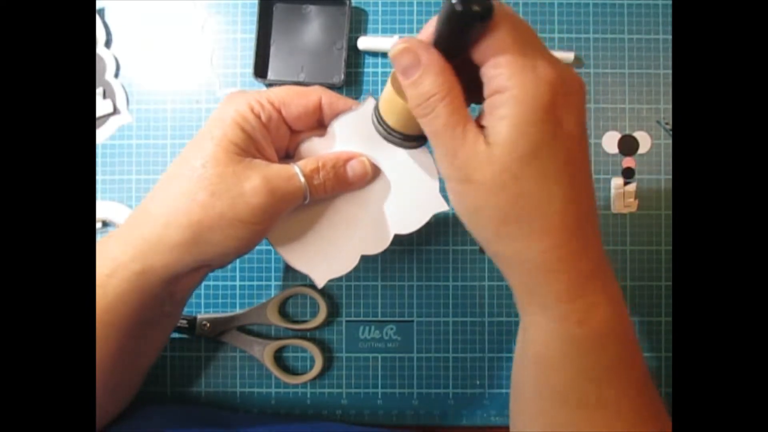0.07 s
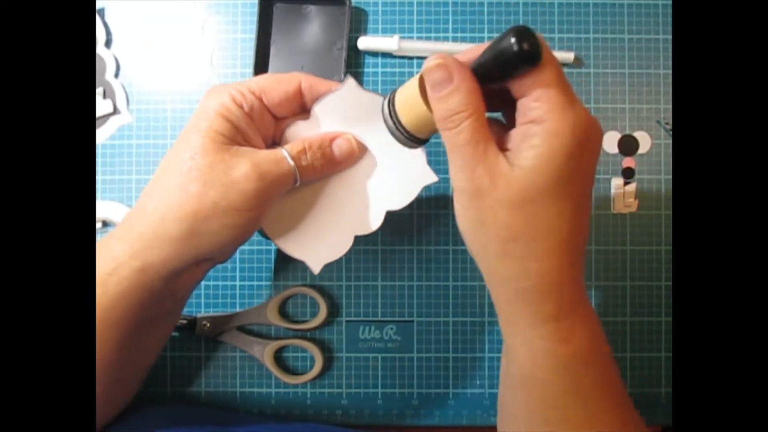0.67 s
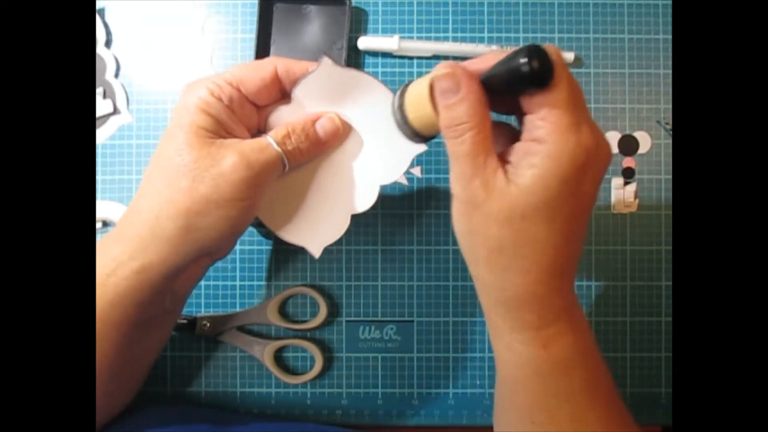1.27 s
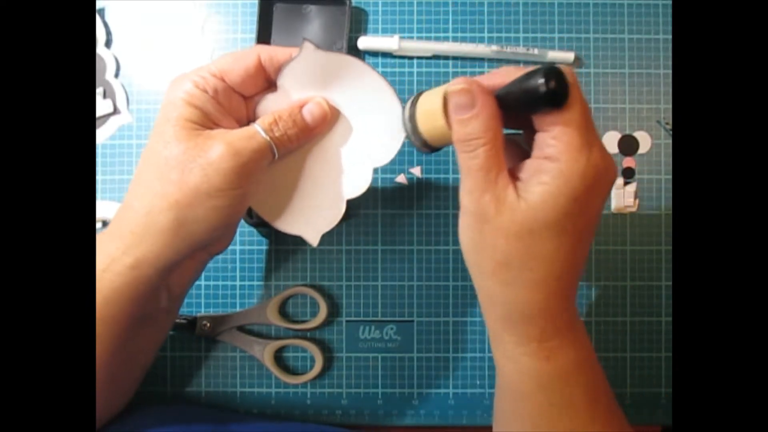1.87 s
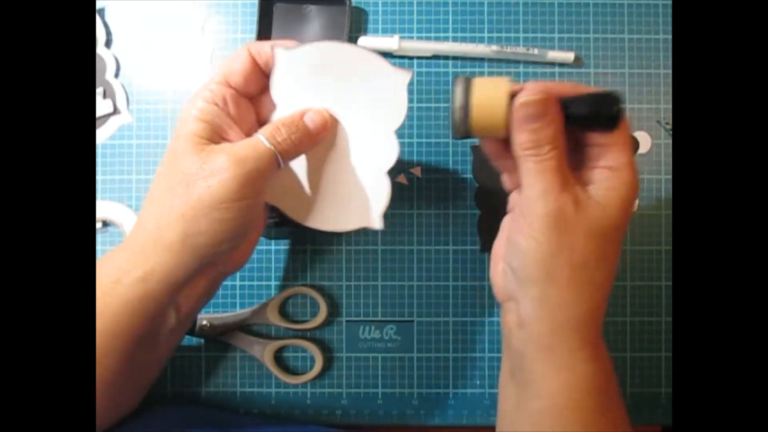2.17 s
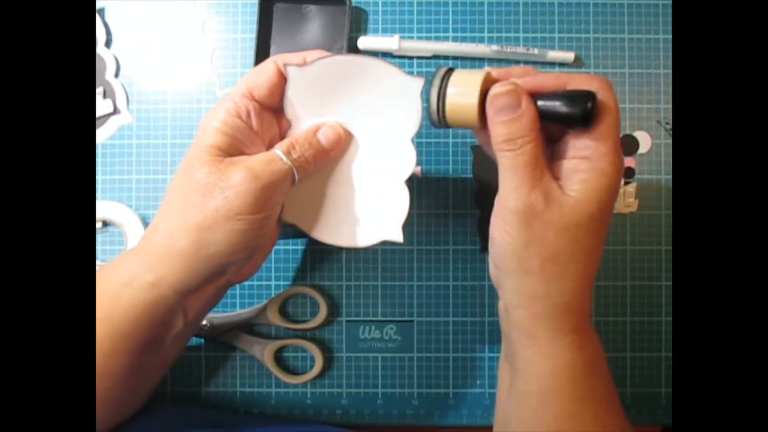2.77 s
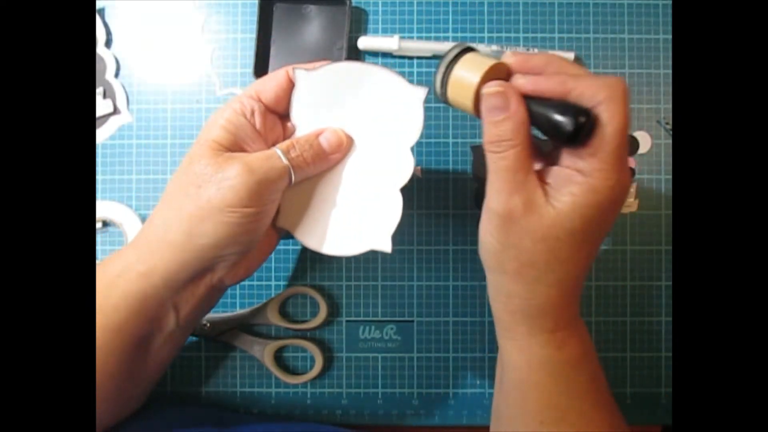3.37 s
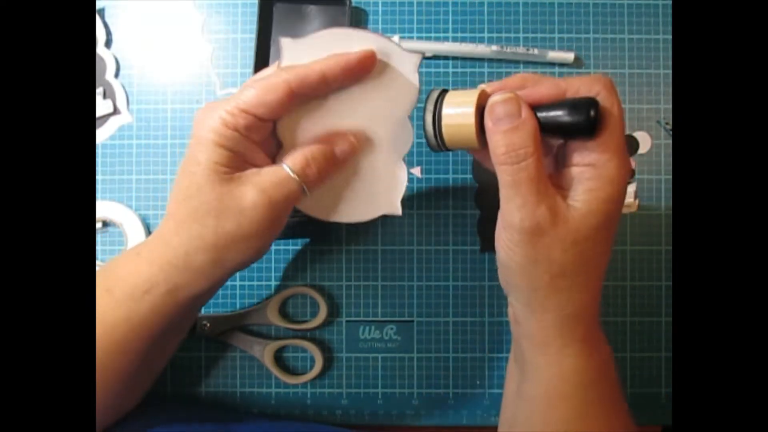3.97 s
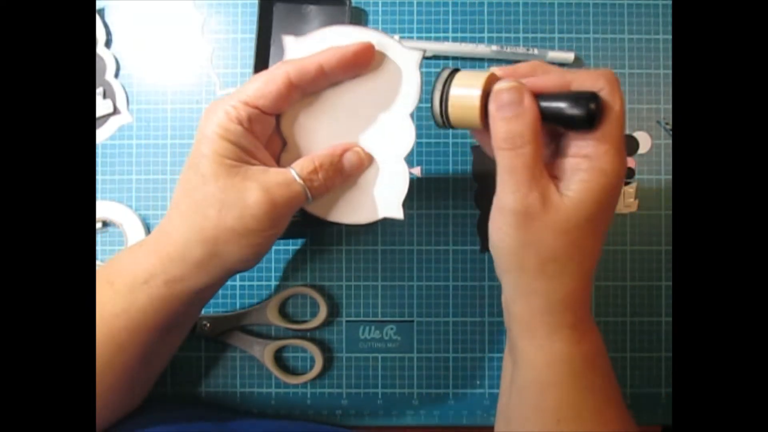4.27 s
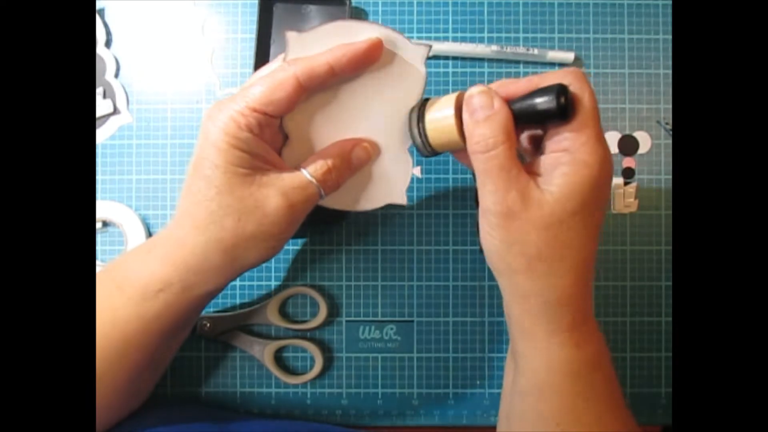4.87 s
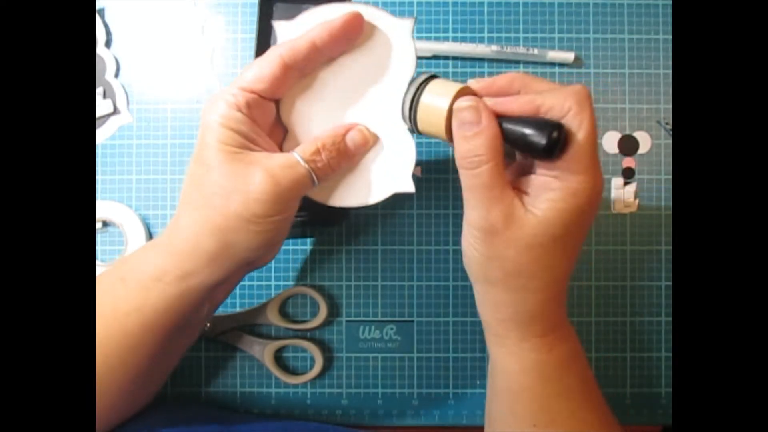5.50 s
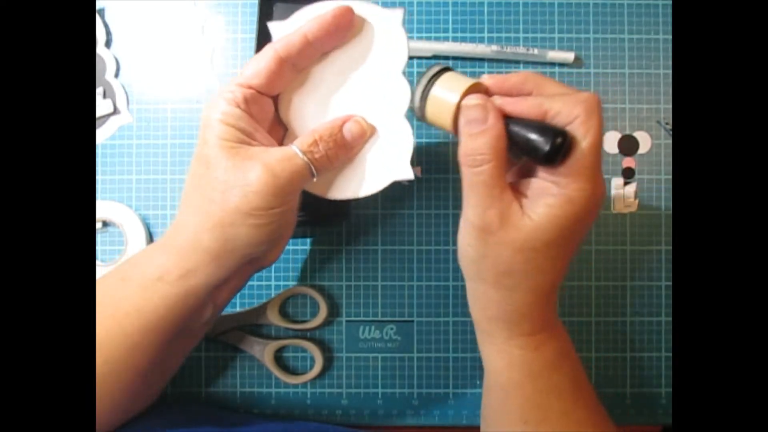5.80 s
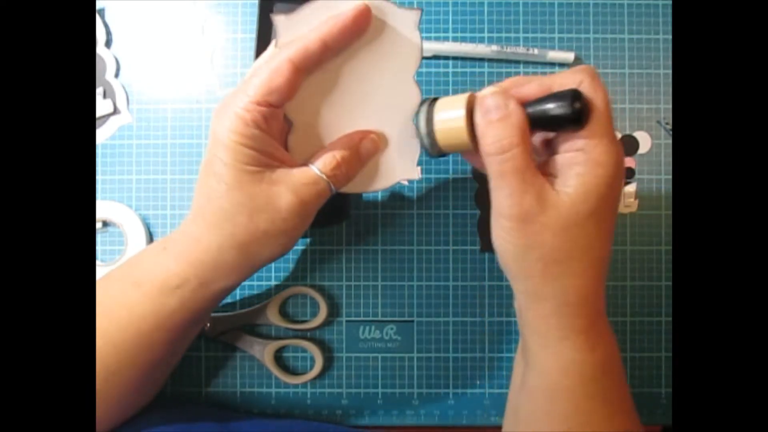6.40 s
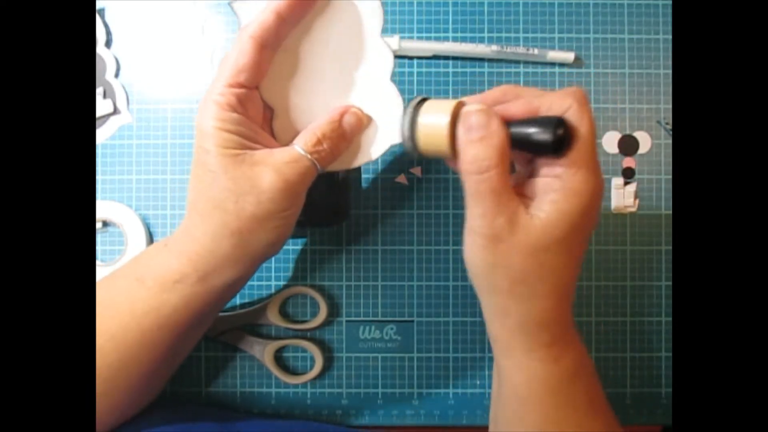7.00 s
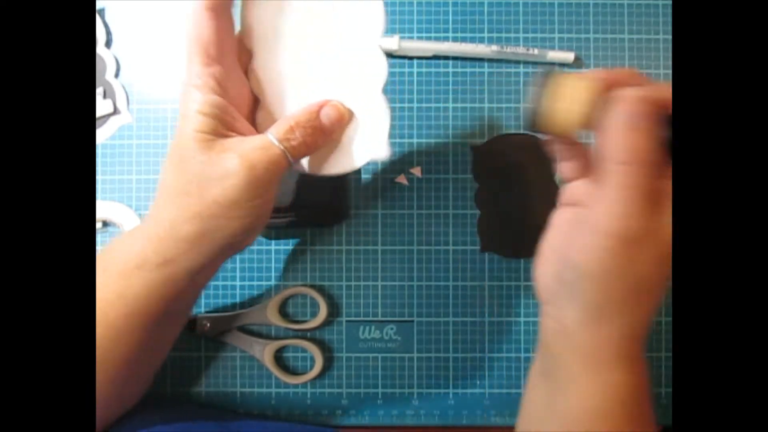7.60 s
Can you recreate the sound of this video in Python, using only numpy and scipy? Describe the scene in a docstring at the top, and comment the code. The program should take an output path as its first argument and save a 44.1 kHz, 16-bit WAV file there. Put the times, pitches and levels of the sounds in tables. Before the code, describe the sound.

A foam ink blender rubs rhythmically along a card's edge, with dry scrapes, small papery snaps and a faint hum.

```python
"""Inking the edge of a card

Close up in a small, dry craft room, a foam ink blender is flicked over the edge of hand-held cardstock,
about five strokes a second. The foam pats, grips and scrapes in fine grains that shake the sheet; the
edge ticks as it catches and snaps back as it slips off the pad. Fingers slide on the card as it is
turned. Mains hum and faint hiss lie behind it all."""
import sys
import numpy as np
from scipy import signal
from scipy.fft import rfft, irfft
from scipy.io import wavfile

SR = 44100
rng = np.random.default_rng(int(sys.argv[2]) if len(sys.argv) > 2 else 0)


def put_to_file(sound):
    """Save the sound as 16-bit audio at rate SR, in the file named by the first command-line argument."""
    columns = np.atleast_2d(sound).T  # one column per channel
    safe = np.clip(columns, -1, 1)
    whole_steps = np.round(safe * 32767)
    wavfile.write(sys.argv[1], SR, whole_steps.astype(np.int16))


N = 337365
TIME = np.arange(N) / SR
BLOW_TIME = TIME[:SR // 8]
FREQS = np.maximum(np.arange(N // 2 + 1) * SR / N, 1)

# Flicks of the foam over the edge. Each row: peak time in seconds, length in seconds, level in dB,
# ring of the rubbed span in Hz.
STROKES = [(0.159, 0.079, -44, 760), (0.352, 0.091, -47, 1410), (0.552, 0.064, -36, 1570),
           (0.763, 0.095, -39.5, 1350), (0.987, 0.083, -41, 760), (1.18, 0.087, -40, 746),
           (1.39, 0.091, -43.5, 806), (1.59, 0.11, -42.5, 935), (1.8, 0.12, -47, 790),
           (2.005, 0.071, -44.5, 800), (2.537, 0.078, -38.5, 1410), (2.739, 0.058, -36, 1470),
           (2.933, 0.057, -36, 990), (3.103, 0.057, -39.5, 1450), (3.299, 0.046, -48, 1500),
           (3.375, 0.074, -46, 1400), (3.58, 0.078, -40.5, 1450), (4.235, 0.076, -41, 730),
           (4.451, 0.047, -40, 760), (4.707, 0.1, -41.5, 820), (4.935, 0.1, -48.5, 900),
           (5.151, 0.08, -48, 724), (5.35, 0.089, -41.5, 960), (5.599, 0.06, -39.5, 890),
           (5.822, 0.057, -43.5, 920), (5.944, 0.047, -45, 1430), (6.069, 0.1, -46, 1130),
           (6.336, 0.061, -39.5, 1240), (6.532, 0.076, -39.5, 945), (6.754, 0.088, -44, 1370),
           (6.948, 0.15, -46.5, 1200), (7.018, 0.063, -47, 1300), (7.149, 0.13, -47.5, 1090),
           (7.351, 0.095, -49, 800), (7.516, 0.057, -37, 1400)]
# Tone of the strokes as the pad works round the card. Each row: time in seconds, body and hiss in dB
# against the stroke's level, ring of the free edge in Hz.
EDGE_COLOUR = [(0.16, 2, -3, 3250), (0.55, -0.5, -5, 3300), (1.8, -0.5, -7, 2960), (2.54, 0, -4.5, 3200),
               (2.75, -2, -6, 3140), (3.1, -2.5, -4, 2870), (3.58, -5, -5.5, 3170), (4.24, 3, -5, 2900),
               (5.15, 4.5, -4, 3200), (5.6, -3.5, -9, 2880), (5.82, 3, -6, 2760), (5.95, 2.5, 1, 2670),
               (6.5, 0.5, -7.5, 2950), (6.75, 1, 0.5, 3060), (7.36, -2.5, 1.5, 2750), (7.51, 3.5, -3, 2830)]
# The bent card springs off the pad. Each row: start in seconds, level in dB, centre of the ring in Hz,
# thump of the two lowest modes in dB, ring of the free edge in dB.
SNAPS = [(0.1654, -30.5, 830, -12, -18), (2.5528, -37.5, 1300, -15, -13), (2.9377, -34, 1100, -12, -9),
         (3.105, -31, 1310, -13, -1), (4.2445, -26, 800, 9.5, -13), (4.4545, -31, 950, 1, -26),
         (4.4764, -27.5, 700, 7, -15), (4.7369, -37, 900, 7, -5), (5.6039, -29, 1000, -17, -2.5),
         (6.0548, -22.5, 890, 4, -7.5), (6.9748, -23.5, 650, 1.5, -39), (7.1707, -19.5, 690, -6, -15),
         (7.5123, -11.5, 970, 3, -14)]
# Bending modes of the held card. Each row: pitch in Hz, level in dB, seconds to fall by 60 dB.
CARD_MODES = [(176, -6, 0.15), (273, 7, 0.021), (441, -11.5, 0.079), (551, -12, 0.14), (661, -5, 0.1),
              (770, 2.5, 0.031), (885, 5, 0.019), (1080, 3, 0.023), (1400, 2, 0.024), (1560, -2.5, 0.038),
              (2322, -8, 0.04), (2810, 6.5, 0.013), (3525, 4, 0.028)]


def from_db(db):
    """Decibels to gain."""
    return 10 ** (np.asarray(db) / 20)


def rms_one(x):
    """Scale to unit rms."""
    return x / np.sqrt(np.mean(x ** 2) + 1e-20)


def on_freqs(points):
    """Read rows of frequency in Hz and value along a log-frequency axis."""
    hz, value = np.transpose(points)
    return np.interp(np.log(FREQS), np.log(hz), value)


def butter(x, hz, kind, order=2):
    """Causal Butterworth filter."""
    return signal.sosfilt(signal.butter(order, hz, kind, fs=SR, output="sos"), x + 1e-18)


def resonator(hz, width_hz):
    """Filter coefficients of a single resonant peak."""
    return signal.iirpeak(hz, hz / width_hz, fs=SR)


def drift(rate_hz):
    """Smooth random wander of unit rms."""
    pole = np.exp(-2 * np.pi * rate_hz / SR)
    return rms_one(signal.lfilter([1], [1, -2 * pole, pole ** 2], rng.standard_normal(N + SR))[SR:])


def delayed(pair, delay_s):
    """Read a steady stereo noise through a moving delay."""
    when = (TIME - delay_s) % TIME[-1]
    return np.array([np.interp(when, TIME, channel) for channel in pair])


def add(out, s, sound):
    """Mix a short sound in at a given time."""
    start = round(s * SR)
    out[:, start:start + sound.shape[-1]] += sound[..., :N - start]


def stereo_noise(pair, colour, likeness):
    """Two unrelated noises become a coloured, partly alike left and right."""
    mid, side = rfft(pair)
    alike = np.clip(on_freqs(likeness), -1, 1)
    spectrum = np.sqrt(1 + alike) * mid + np.sqrt(1 - alike) * side * [[1], [-1]]
    return irfft(from_db(on_freqs(colour)) * spectrum, N)


def room_tone(air_db=-45, mains_hz=59.8, mains_db=-54.5, octave_hz=120):
    """Rumble and hiss from all round the room, with a gently wavering mains hum."""
    # Colour of the room's noise. Each row: frequency in Hz, relative level in dB.
    colour = [(20, 4.5), (40, -7), (58, 11.5), (80, -6.5), (105, 6), (128, 14), (160, 3.5), (200, -4.5),
              (250, -2.5), (450, -10.5), (660, -10), (1500, -18.5), (2000, -23), (7000, -26), (16000, -32)]
    # Likeness of left and right for distant sound. Each row: frequency in Hz, correlation.
    likeness = [(30, 0.4), (140, 0.89), (250, 0.26), (500, 0.0035), (650, 0.51), (1500, 0.37),
                (5000, 0.015)]
    # The hum's octave swells and fades. Each row: time in seconds, level in dB.
    octave_levels = [(0.0, -68), (1.4, -53.5), (2.42, -38), (2.66, -46), (3.3, -51), (4.1, -51),
                     (4.85, -47), (5.3, -57), (6.2, -46.5), (7.65, -45.5)]
    air = rms_one(stereo_noise(rng.standard_normal((2, N)), colour, likeness))
    partials = [(mains_hz, mains_db), (octave_hz, np.interp(TIME, *np.transpose(octave_levels)))]
    hum = sum(from_db(db) * np.sin(2 * np.pi * hz * TIME + drift(rate_hz=4)) for hz, db in partials)
    return from_db(air_db) * air + hum


def edge_pitch(s):
    """The free edge rings at a pitch that moves as the card is turned and held anew."""
    when, _, _, ring_hz = np.transpose(EDGE_COLOUR)
    return np.interp(s, when, ring_hz)


def span_pitch(s):
    """The span of card between thumb and pad has its own pitch in every stroke."""
    when, _, _, ring_hz = np.transpose(STROKES)
    return ring_hz[np.argmin(np.abs(when - s))]


def moving_ring(grains, pitch, width_hz, size=512):
    """A resonance whose centre follows a pitch in time."""
    out, state = np.zeros((2, N)), np.zeros((2, 2))
    for i in range(0, N, size):
        peak = resonator(pitch(TIME[i]), width_hz)
        out[:, i:i + size], state = signal.lfilter(*peak, grains[:, i:i + size], zi=state)
    return out


def card_resonance(grains, lift_db=-2.0, swing_db=2.5, swing_hz=3, widen=1.12, bend=.05):
    """Friction shakes the card's upper modes; which ones answer depends on where the edge is touched."""
    ringing = 0
    for hz, _, t60 in CARD_MODES[4:]:
        width_hz = widen * np.log(1000) / (np.pi * t60)
        answer = from_db(lift_db + swing_db * np.tanh(drift(swing_hz)))
        ringing = ringing + answer * signal.lfilter(*resonator(hz, width_hz), grains)
    edge = from_db(2.2) * moving_ring(grains, edge_pitch, width_hz=440)
    span = moving_ring(grains, span_pitch, width_hz=270)
    # bending stiffens the sheet, so its modes glide a little from stroke to stroke
    glide_s = np.cumsum(bend * np.tanh(drift(swing_hz))) / SR
    sheet = grains + edge + span + delayed(ringing, glide_s)
    # a faint, slowly drifting comb gives each stroke its own fine colour
    comb_s = 0.001112 * (1 + np.tanh(drift(0.92)) / 10)
    return sheet + 0.25 * delayed(sheet, comb_s)


def friction(passes, colour, slips_per_s, crackle_db, judder_db, judder_hz, sharpness,
             boom_db, boom_growth, trim_db):
    """Tiny fibre slips, swelling and fading with each pass, heard as boom, body, rasp and hiss."""
    # Likeness of left and right close to the microphone. Each row: frequency in Hz, correlation.
    likeness = [(200, 0.89), (700, 0.99), (1600, 1), (3300, 0.94), (4300, 0.54), (9000, 0.62),
                (15000, 0.32)]
    # Borders of the boom, body, rasp and hiss bands in Hz.
    band_edges = [60, 500, 2200, 7500, 17000]
    # Release of each band as a multiple of the pass's fall: the treble stops first.
    releases = [1.3, 0.99, 0.9, 0.86]
    size_db = crackle_db * np.minimum(rng.exponential(1, N), 5)
    slipping = rng.random(N) < slips_per_s / SR
    slips = slipping * from_db(size_db + judder_db * np.tanh(drift(judder_hz)))
    grains = stereo_noise(slips * rng.standard_normal((2, N)), colour, likeness)
    sheet = rfft(card_resonance(grains))
    power = np.zeros((4, N))
    for s, rise, fall, rasp_db, body_db, hiss_db in passes:
        near = slice(*np.searchsorted(TIME, [s - 3 * rise, s + 3 * fall]))
        since = TIME[near] - s
        pressing = np.maximum(-since / rise, 0) ** sharpness
        letting_go = np.maximum(since / (fall * np.array(releases)[:, None]), 0) ** 2
        # the more the whole sheet is shaken, the faster its lowest bending grows
        bands_db = np.array([boom_db + boom_growth * body_db, body_db, 0, hiss_db]) + trim_db
        power[:, near] += from_db(rasp_db + bands_db[:, None] - 20 * (pressing + letting_go)) ** 2
    bands = [rms_one(irfft(sheet * (FREQS >= low) * (FREQS < high), N))
             for low, high in zip(band_edges, band_edges[1:])]
    return sum(gain * band for gain, band in zip(np.sqrt(power), bands))


def foam_scrapes(rise_share=0.58):
    """The foam drags over the edge: swelling strokes, brief grips and a quick slip into each snap."""
    # Colour of foam on card. Each row: frequency in Hz, relative level in dB.
    colour = [(150, -9.5), (450, -6), (660, -2), (900, -3), (1200, -2), (1400, 2), (1700, -5.5), (2200, -8),
              (3300, -7), (4100, -11.5), (5500, -5.5), (8500, -10.5), (12000, -14.5), (16000, -20)]
    # The pad grips with a dull scuff just before it slides. Each row: peak time in seconds, level in dB.
    scuffs = [(0.506, -44.5), (0.708, -41), (0.931, -40.5), (1.128, -47.5), (1.958, -49), (2.512, -44),
              (3.564, -45.5)]
    s, length, level_db, _ = np.transpose(STROKES)
    when, body_db, hiss_db, _ = np.transpose(EDGE_COLOUR)
    rise = length * rise_share
    # Each pass: peak time, rise and fall in seconds, level in dB, body and hiss in dB against it.
    strokes = list(zip(s, rise, length - rise, level_db,
                       np.interp(s, when, body_db), np.interp(s, when, hiss_db)))
    grips = [(at, 0.014, 0.04, db, 1.5, -13) for at, db in scuffs]
    slips = [(at, 0.011, 0.006, min(db - 14, -40), 3, -3.5) for at, db, *_ in SNAPS]
    return friction(strokes + grips + slips, colour, slips_per_s=14000, crackle_db=-0.03, judder_db=4.0,
                    judder_hz=112, sharpness=1.48, boom_db=-16.0, boom_growth=3.2, trim_db=0.67)


def level_attack(ring):
    """Scale a ring to unit spread over its first ten milliseconds."""
    return ring / np.std(ring[BLOW_TIME < .01])


def card_ring(centre_hz, reach, thump_db=0, ring_db=-5.0, focus_db=4.0, rebound_s=0.00258):
    """A blow starts all the modes at once: a slow push favours the low ones, a quick catch the high."""
    hz, mode_db, t60 = np.array(CARD_MODES).T[:, :, None]
    strength_db = mode_db - focus_db * np.log2(hz / centre_hz) ** 2 + rng.standard_normal(hz.shape)
    strength_db[:2] += thump_db
    decays = from_db(strength_db - 60 * BLOW_TIME / t60)
    ring = np.sum(decays * np.sin(2 * np.pi * hz * BLOW_TIME), axis=0)
    # the edge rebounds and touches again at half strength, which colours every blow differently
    lag = 1 + int(rng.uniform(1, 2.004) * rebound_s * SR)
    ring = ring + .5 * np.pad(ring, (lag, 0))[:len(ring)]
    ring = butter(ring, reach * centre_hz, "low", order=3)   # the padded contact dulls the top
    ring = butter(ring, 143, "high")   # the small sheet radiates little bass
    return from_db(ring_db) * level_attack(ring)


def crack(spike_db=16.5, grit_db=8, grit_t60=0.014, band_hz=(2200, 10000), width=0.55):
    """One sharp click of the paper's edge, trailed by a little grit."""
    mid, side = rng.uniform(-np.sqrt(3), np.sqrt(3), (2, len(BLOW_TIME)))
    grit = mid + width * side * np.array([[1], [-1]])
    burst = grit * from_db(grit_db - 60 * BLOW_TIME / grit_t60)
    burst[:, 0] -= from_db(spike_db)
    return butter(burst, band_hz, "band", order=1)


def card_snaps(edge_t60=0.021, crack_db=-13):
    """The freed edge cracks and rings with a hollow note; the whole sheet thumps and rings with it."""
    out = np.zeros((2, N))
    for s, level_db, centre_hz, thump_db, edge_db in SNAPS:
        edge_decay = from_db(edge_db + 6 - 60 * BLOW_TIME / edge_t60)
        edge = edge_decay * np.sin(2 * np.pi * edge_pitch(s) * BLOW_TIME)
        sheet = card_ring(centre_hz, reach=2.53, thump_db=thump_db)
        add(out, s, from_db(level_db) * (sheet + edge + from_db(crack_db) * crack()))
    return out


def foam_pats(flatten_s=0.0014):
    """Many fibres land one after another, so the card answers with a blurred, dull ring."""
    # Soft landings ahead of a stroke. Each row: start in seconds, level in dB, centre of the ring in Hz.
    pats = [(0.2943, -47.5, 900), (0.478, -47.5, 1220), (0.674, -47.5, 1010), (0.888, -44.5, 800),
            (1.089, -44, 850), (1.302, -46.5, 920), (1.513, -46.5, 700), (2.4228, -40, 1150),
            (2.659, -49, 1310), (3.267, -47, 1100), (4.125, -47, 746), (4.413, -46.5, 800),
            (5.267, -44.5, 1010), (5.502, -45, 750), (6.233, -46.5, 940)]
    out, age = np.zeros((2, N)), BLOW_TIME / flatten_s
    for s, level_db, centre_hz in pats:
        press = rng.standard_normal(len(age)) * np.sqrt(age) * np.exp(-age)
        ring = signal.fftconvolve(card_ring(centre_hz, reach=1.8), press)[:len(age)]
        add(out, s, from_db(level_db) * level_attack(ring))
    return out


def edge_ticks(crack_db=-3.5):
    """The edge catches with a crack and a thin ring."""
    # Catches of the edge. Each row: start in seconds, level in dB.
    ticks = [(0.9346, -35.5), (1.5484, -41.5), (2.327, -52), (3.334, -44), (3.952, -47), (4.131, -50),
             (4.8063, -48.5), (5.373, -35), (5.939, -35.5), (5.989, -44), (6.6382, -43.5), (6.6716, -36.5),
             (6.696, -46), (7.0105, -45)]
    out = np.zeros((2, N))
    for s, level_db in ticks:
        ring = card_ring(centre_hz=1680, reach=2.4)
        add(out, s, from_db(level_db) * (ring + from_db(crack_db) * crack()))
    return out


def finger_slides(rise_share=0.35):
    """Skin rubs the card as it is turned; each slide starts quickly and trails off."""
    # Slides of the fingers. Each row: peak time and length in seconds, level and brightness in dB.
    slides = [(2.095, 0.35, -51, -0.5), (2.204, 0.041, -63, -11), (2.41, 0.17, -52.5, 3.5),
              (3.667, 0.25, -52.5, -1), (3.874, 0.1, -58.5, 0.5), (3.96, 0.066, -43.5, 2.5),
              (4.036, 0.3, -56, -0.5), (4.69, 1, -69, -9.5), (5.198, 0.031, -45.5, -1.5),
              (6.02, 0.21, -53.5, -1), (6.121, 0.025, -50.5, -0.5), (6.247, 0.031, -49, -0.5),
              (6.673, 0.026, -40.5, -0.5), (7.614, 0.18, -42.5, 3.5)]
    # Colour of skin on card. Each row: frequency in Hz, relative level in dB.
    colour = [(150, 7), (450, -1), (700, 2), (1100, -4), (1450, 3), (2000, -6), (3000, -12), (4200, -8),
              (6500, -3), (9000, -7.5), (16000, -12)]
    s, length, level_db, bright_db = np.transpose(slides)
    rise = length * rise_share
    body_db = -4 - 1.66 * bright_db   # a light, bright touch shakes the card less
    hiss_db = bright_db - 0.5
    passes = zip(s, rise, length - rise, level_db, body_db, hiss_db)
    return friction(passes, colour, slips_per_s=9800, crackle_db=1.5, judder_db=1.5, judder_hz=60.6,
                    sharpness=1.54, boom_db=-5.5, boom_growth=0.61, trim_db=0.94)


def room_tail(x, wall_hz=2200, delay_s=0.0076, t60=0.15):
    """The walls return a short, dull tail, different in each channel."""
    t = TIME[:SR // 3]
    noise = butter(rng.standard_normal((2, len(t))), wall_hz, "low")
    tail = noise * from_db(-60 * t / t60) * (t > delay_s)
    tail /= np.sqrt(np.sum(tail ** 2, axis=1, keepdims=True) * SR / (2 * wall_hz))
    return signal.fftconvolve(x, tail, axes=1)[:, :N]


def scene(room_db=-15.5):
    """Foam, fingers and card close to the microphone, the room behind, all leaning slightly left."""
    near = foam_scrapes() + finger_slides() + card_snaps() + edge_ticks() + foam_pats()
    return (near + from_db(room_db) * room_tail(near) + room_tone()) * from_db([[.2], [-.2]])


def record(dry, cutoff_hz=15900):
    """The microphone's housing cuts a few dips in the treble; the top is cut steeply."""
    # Dips from the housing. Each row: centre in Hz, width in Hz, depth in dB.
    dips = [(2215, 95, -5), (7750, 190, -20), (10650, 2200, -4)]
    for hz, width_hz, depth_db in dips:
        dry = dry + (from_db(depth_db) - 1) * signal.lfilter(*resonator(hz, width_hz), dry)
    return signal.sosfilt(signal.ellip(12, .1, 80, cutoff_hz, fs=SR, output="sos"), dry)


dry = scene()
out = record(dry)
put_to_file(out)
```